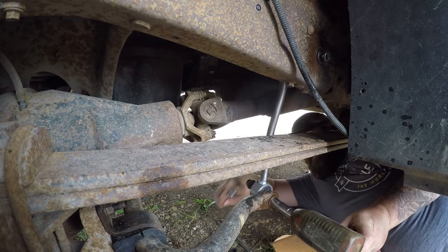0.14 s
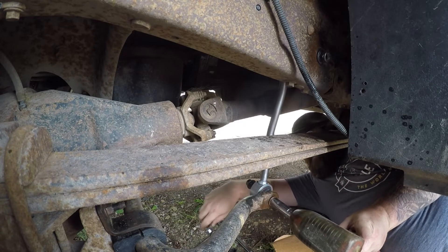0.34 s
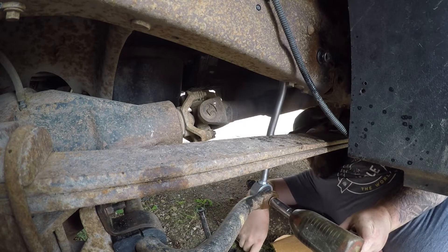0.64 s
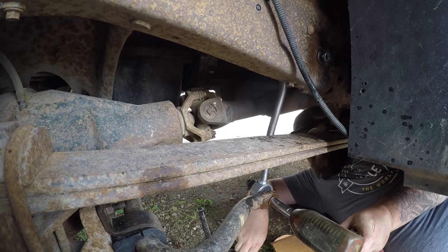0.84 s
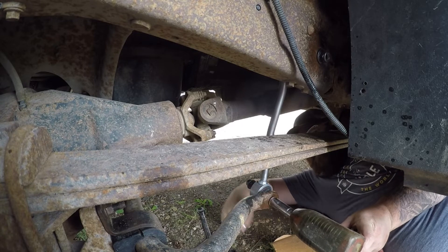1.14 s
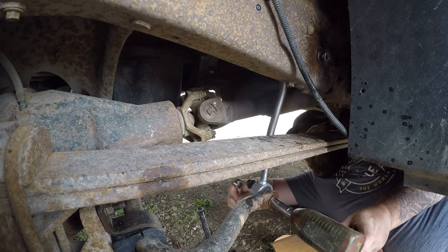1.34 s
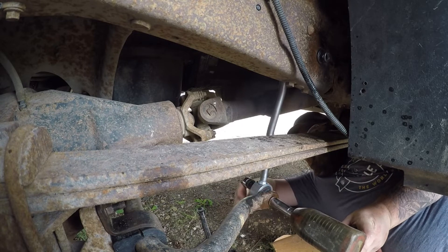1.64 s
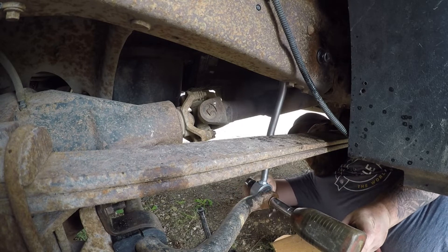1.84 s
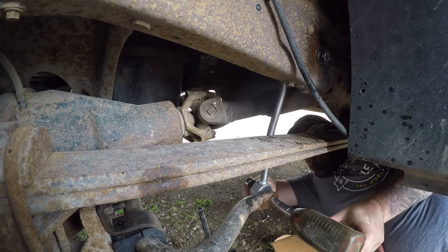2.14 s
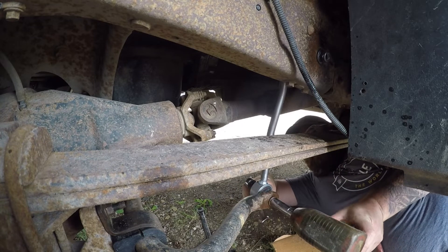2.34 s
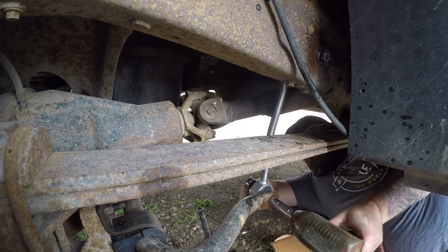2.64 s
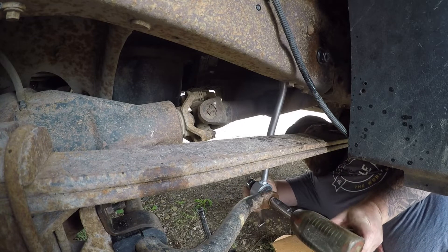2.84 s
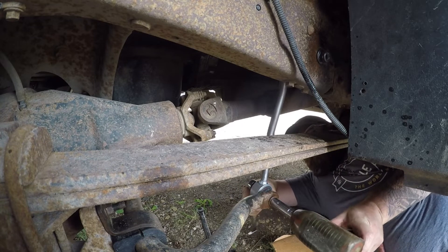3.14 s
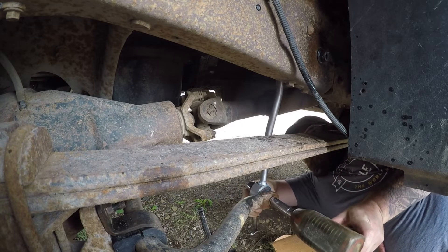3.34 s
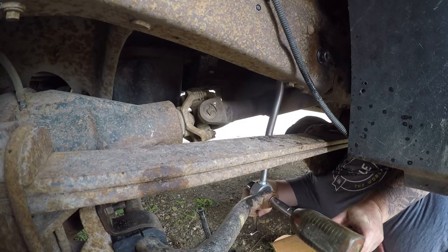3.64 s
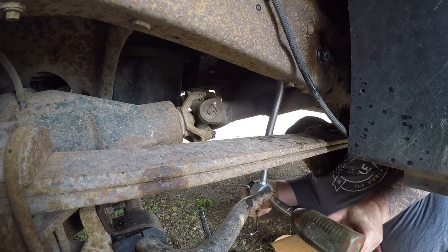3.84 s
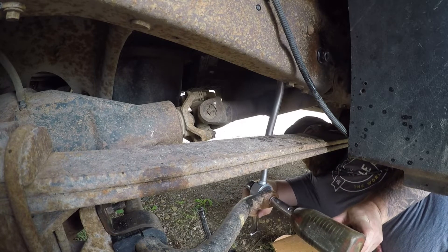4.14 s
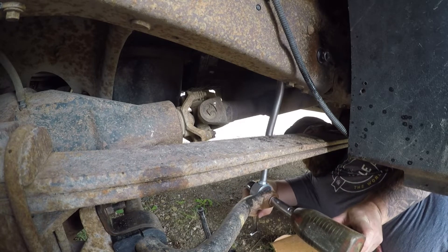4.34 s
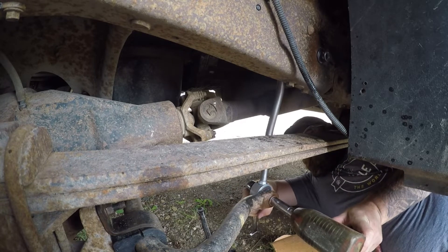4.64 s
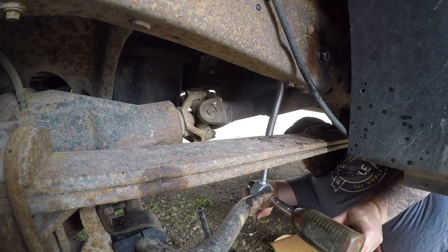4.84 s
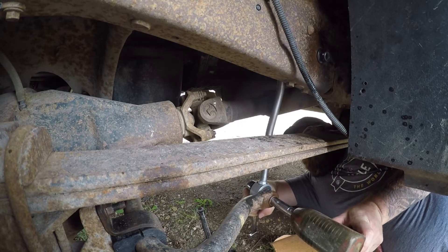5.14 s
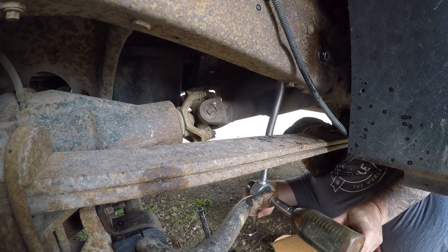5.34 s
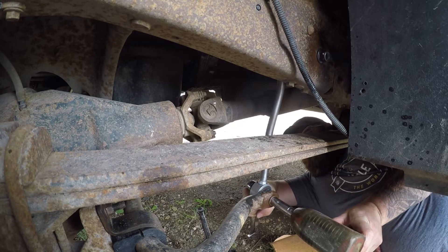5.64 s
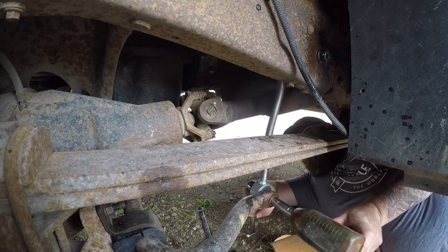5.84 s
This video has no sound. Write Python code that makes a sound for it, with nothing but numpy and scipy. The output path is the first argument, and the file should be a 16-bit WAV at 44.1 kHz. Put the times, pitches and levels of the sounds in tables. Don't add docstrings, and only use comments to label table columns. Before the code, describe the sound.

Close, dry sound with boomy knocks through the truck frame. A socket rattles and rings briefly, scuffs, then snaps and thuds onto a nut. Three quick pulls of a power ratchet follow, the first spinning freely, then a long, louder run with rapid pawl knocking about twenty times a second, over a faint low garage murmur.

```python
import sys
import numpy as np
from scipy import signal
from scipy.fft import rfft, irfft, next_fast_len
from scipy.io import wavfile
from scipy.ndimage import uniform_filter1d

SR = 44100
rng = np.random.default_rng(int(sys.argv[2]) if len(sys.argv) > 2 else 0)


def voltage_ratio(level):
    return 10 ** (np.asarray(level, float) / 20)


def log_audio(samples):
    frames = np.atleast_2d(samples).T
    limited = np.clip(frames, -1, 1)
    pcm = np.round(limited * 32767).astype(np.int16)
    wavfile.write(sys.argv[1], SR, pcm)


N = 264600
TIME = np.arange(N) / SR
COARSE = TIME[::16]

# (pulled [s], released [s], level [dB], spin-up [s], free spin before the pawl bites [s])
BURSTS = [
    (2.362, 2.714, -31, .04, .16),
    (2.768, 2.957, -32.5, .026, .012),
    (2.992, 3.675, -31.8, .019, .022),
    (3.871, 6.1, -27, .024, .012),
]
# (time [s], load on the nut [0-1], push on the linkage [dB])
HAND = [(2.4, .6, -21), (2.72, .8, -19), (2.76, .5, -30), (2.93, .35, -24.5), (3.03, .3, -29),
        (3.23, .2, -27), (3.42, .35, -37), (3.65, 1.1, -36), (3.9, .7, -32), (4.3, .7, -27), (4.58, 1, -29),
        (4.9, .8, -24), (5.25, .3, -29), (5.45, 0, -28.5), (6, .1, -33)]
# (frequency [Hz], width [Hz], level [dB])
HOUSING = [(560, 38, -0.5), (806, 42, -2), (864, 62, -3.5), (1192, 52, -4.5), (1600, 90, -11),
           (1720, 120, -10), (2060, 100, -10), (2380, 70, -12)]
HEAD = [(4430, 38, 0), (4656, 40, -4), (4920, 60, 1), (5185, 55, -1), (5440, 50, -3), (5590, 75, 2),
        (5932, 55, -2), (6250, 50, -6), (6740, 70, -2.5), (7400, 61, -7), (8070, 41, -7.5),
        (8260, 130, -7.5), (9570, 36, -20)]
# (frequency [Hz], density [dB per Hz])
HOUSING_RASP = [(180, -35), (300, -1), (479, -15), (868, -9.5), (1040, -15), (1190, -5.5), (1330, -10),
                (3800, -12), (4940, -32), (8360, -120)]
HEAD_RASP = [(1650, -21), (2800, -8.5), (3400, -14), (4310, -0.5), (5400, -1.5), (6180, -7), (6680, -5.5),
             (8310, -7), (11500, -27), (15000, -53.5), (22000, -120)]
# (time [s], peak [dB], frequency [Hz], t60 [s])
THUMPS = [(0.0, -12.5, 200, 0.1), (0.033, -16.5, 125, 0.16), (.048, -18, 230, .08),
          (0.078, -12.5, 133.4, 0.13), (.402, -30, 140, .15), (1.112, -34, 249, 0.14),
          (1.391, -16, 165, 0.14), (1.444, -11.5, 200, 0.1), (1.462, -15, 140, .12), (1.46, -26, 302, .25),
          (1.596, -22, 250, .05), (1.606, -12, 190, 0.1), (1.7, -8, 232, 0.08), (1.728, -13, 204, 0.08),
          (1.75, -13, 215, .07), (1.774, -9, 199, 0.055), (1.797, -11, 236.6, 0.1), (1.855, -9, 227, 0.08),
          (1.931, -18, 230, .05), (1.944, -11, 217, 0.07), (1.97, -20, 190, .08), (2.0, -24, 200, .1),
          (2.064, -20, 213.4, 0.12), (2.165, -27, 215, .12), (2.33, -38, 130, .15), (2.72, -13, 195, 0.06),
          (3.879, -24, 140, .07), (3.897, -23, 110, .1)]


def unit(x):
    return x / np.sqrt(np.mean(x ** 2) + 1e-20)


def along(points, hz):
    f, v = np.transpose(points)
    return np.interp(np.log(hz + 1), np.log(f + 1), v)


def curves(rows):
    s, *columns = np.transpose(rows)
    return [np.interp(TIME, s, column) for column in columns]


def filtered(x, response):
    m = next_fast_len(x.shape[-1] + 8192)
    spectrum = rfft(x, m) * response(np.fft.rfftfreq(m, 1 / SR))
    return irfft(spectrum, m)[..., :x.shape[-1]]


def resonances(peaks):
    def response(f):
        total = 0
        for k, (centre, width, db) in enumerate(peaks):
            damping = 1j * f * width
            total = total + (-1) ** k * voltage_ratio(db) * damping / (centre * centre - f * f + damping)
        return total
    return response


def noise(length=N):
    return rng.standard_normal((2, length))


def uneven(length, db, size):
    return voltage_ratio(db * unit(uniform_filter1d(rng.standard_normal(length), size=size)))


def ring(modes, t, rise, scatter_db):
    hz, db, t60 = np.transpose(modes)[..., None]
    level = voltage_ratio(db + scatter_db * rng.standard_normal(hz.shape) - 60 * t / np.clip(t60, .01, 3))
    phase = 2 * np.pi * (hz * t + rng.random((2,) + hz.shape))
    return (level * np.sin(phase)).sum(1) * (1 - np.exp(-t / rise))


def add_at(out, s, sound):
    place = out[:, round(s * SR):][:, :sound.shape[1]]
    place += sound[:, :place.shape[1]]


def trigger(lag=0, fall_db_per_s=700):
    power, shape, free = np.zeros((3, len(COARSE)))
    for pulled, released, db, spin_up, free_s in BURSTS:
        since = COARSE - pulled
        rise_db = -30 * np.clip(1 - since / (spin_up + lag), 0, 1)
        after = np.clip(COARSE - released, 0, 1)
        whirr = voltage_ratio(-24 - 300 * after) * (after > 0)
        fall = voltage_ratio(-fall_db_per_s * after) + whirr
        gain = np.clip(since / .008, 0, 1) * voltage_ratio(rise_db) * fall
        power = power + (voltage_ratio(db) * gain) ** 2
        shape = shape + gain ** 2
        free += (since > 0) * np.clip(2 - 2 * since / free_s, 0, 1)
    return [np.interp(TIME, COARSE, v) for v in (np.sqrt(power), np.sqrt(shape), free)]


def turns():
    # (time [s], speed [turns per s])
    crank = [(3.2, 24.212), (3.45, 26.077), (3.75, 20.931), (3.95, 25.06), (4.15, 26.89), (4.35, 22.777),
             (4.55, 21.479), (4.75, 21.748), (4.95, 21.496), (5.15, 21.968), (5.35, 20.808), (5.55, 18.778),
             (5.7, 20.413), (5.85, 21.536), (6, 20.913)]
    return .186 + np.cumsum(curves(crank)[0]) / SR


def strokes(decay):
    # (place in the turn [0-1], body [dB], bright [dB], timing scatter [s])
    pawl = [
        (.7, -5, -14, .004),
        (.84, -2, -9, .003),
        (.07, 1, 0, .0008),
    ]
    body, bright = np.zeros((2, N))
    for place, body_db, bright_db, scatter in pawl:
        at = np.flatnonzero(np.diff(np.floor(turns() - place)))
        luck = rng.standard_normal((len(at), 3))
        at = np.clip(at + (luck[:, 0] * scatter * SR).astype(int), 0, N - 1)
        body[at] = voltage_ratio(body_db + 1.5 * luck[:, 1])
        bright[at] = voltage_ratio(bright_db + 2.5 * luck[:, 2])
    soft = filtered(body, lambda f: 1 / (1 + 1j * f / 1000) ** 2)
    return soft, bright, signal.lfilter([1], [1, -np.exp(-1 / (decay * SR))], bright)


def patches(x, depth_db):
    z = signal.stft(x, nperseg=512)[2]
    field = uniform_filter1d(rng.standard_normal(z.shape[1:]), size=4, axis=0)
    field = uniform_filter1d(field, size=12, axis=1)
    return unit(signal.istft(z * voltage_ratio(depth_db * unit(field)), nperseg=512)[1][:, :N])


def rasp(drive, spectrum, peaks, ring_db, shaking=None):
    shaking = drive if shaking is None else shaking
    broad = unit(filtered(drive, lambda f: voltage_ratio(along(spectrum, f))))
    ringing = unit(filtered(shaking, resonances(peaks)))
    return unit(broad + voltage_ratio(ring_db) * ringing)


def ratchet(body, snaps, clicks):
    # (from [s], to [s])
    loading = (2.6, 3.2)
    # (time [s], level [dB])
    slips = [
        (3.241, 3),
        (4.97, 4),
    ]
    # (frequency [Hz], density [dB per Hz])
    whistle_colour = [(5880, -24), (10000, -3), (10800, -14), (11900, -4), (12500, 1), (13200, 0.5),
                      (14900, -2.5), (15200, -13)]
    # (frequency [Hz], width [Hz], level [dB])
    tick_modes = [(4500, 220, -3), (5600, 200, -2), (6750, 140, 0), (8100, 130, 2.5), (9700, 400, -10)]
    # (frequency [Hz], width [Hz], level [dB])
    free_modes = [(840, 160, -3.5), (2180, 47, -7.5), (3420, 110, -7.5), (4630, 120, -0.5), (5140, 47, -5),
                  (5260, 45, -2.5), (5994, 150, 1.5), (6860, 57, -2), (6950, 55, -3), (7360, 70, -3),
                  (7750, 46, -7), (7880, 110, -2), (10170, 300, -17)]
    # (frequency [Hz], difference [dB])
    free_colour = [(300, -4.5), (600, -1.5), (900, -2), (1200, -2.5), (2000, 3.5), (3300, 4.5), (4600, -4),
                   (6000, -0.5), (8000, 0.5), (10300, 6), (13000, 8.5)]
    # (frequency [Hz], width [Hz], level [dB])
    racing = [(3050, 160, -11), (5880, 260, 0), (7450, 120, -7), (10300, 700, -12)]

    running, _, free_spin = trigger()
    clicks = clicks * np.interp(TIME, loading, (.4, 1))
    effort = curves(HAND)[0]
    slip_db = sum(db * np.exp(-((TIME - s) / .01) ** 2) for s, db in slips)
    head_db = 2.5 * effort + 3 * free_spin + slip_db
    housing_db = -3.5 - 7 * free_spin - slip_db
    whistle_db = -10.5 - 10.5 * effort - slip_db

    grit = uneven(N, 1.3, 40)
    strain = 1 + .12 * np.cos(2 * np.pi * turns())
    chatter = patches(noise(), depth_db=1.18) * grit * (1 + 0.55 * clicks)
    shaking = patches(noise(), depth_db=1.8) * grit * (1 + .9 * clicks)
    blows = 40 * body * [[1], [-1]]

    head = rasp(chatter, HEAD_RASP, HEAD, ring_db=0, shaking=shaking)
    grinding = noise() * grit * strain * (1 + .8 * clicks) + blows
    housing = rasp(grinding, HOUSING_RASP, HOUSING, ring_db=3, shaking=shaking * strain + 1.1 * blows)
    hiss = noise() * grit * (1 + .9 * clicks)
    whistle = unit(filtered(hiss, lambda f: voltage_ratio(along(whistle_colour, f))))
    ticks = unit(filtered(snaps, lambda f: resonances(tick_modes)(f) / (1 + 1j * f / 9000) ** 2))
    loaded = head + voltage_ratio(housing_db) * housing + voltage_ratio(-13) * ticks

    span = slice(round(2.3 * SR), round(3.3 * SR))
    free_head = rasp(chatter[:, span], HEAD_RASP, free_modes[2:], ring_db=-0.5, shaking=shaking[:, span])
    free_drive = (noise() * grit + blows)[:, span]
    free_housing = rasp(free_drive, HOUSING_RASP, free_modes[:2], ring_db=4)
    recolour = lambda f: voltage_ratio(along(free_colour, f))
    free = np.zeros((2, N))
    free[:, span] = filtered(free_head, recolour)
    free[:, span] += voltage_ratio(housing_db[span] - 0.5) * filtered(free_housing, recolour)
    free[:, span] += voltage_ratio(-1) * free_spin[span] * unit(filtered(chatter[:, span], resonances(racing)))

    load = np.interp(TIME, loading, (0, np.pi / 2))
    tool = np.cos(load) * free + np.sin(load) * loaded + voltage_ratio(whistle_db) * whistle
    return tool * voltage_ratio(head_db) * running


def coasting():
    # (time [s], level [dB], t60 [s])
    last_ticks = [
        (3.721, -30.5, 0.076),
        (3.787, -53, 0.063),
        (3.841, -53, 0.053),
    ]
    # (from [s], to [s], frequency [Hz], level [dB])
    wake = (3.855, 4, 4648, -44)
    out, t = np.zeros((2, N)), np.arange(SR // 5) / SR
    for s, db, t60 in last_ticks:
        tick = rasp(noise(len(t)), HEAD_RASP, HEAD, ring_db=3)
        tick = tick + 0.83 * rasp(noise(len(t)), HOUSING_RASP, HOUSING, ring_db=-1)
        add_at(out, s, voltage_ratio(db - 60 * t / t60) * (1 - np.exp(-t / 0.0018)) * tick)
    start, end, hz, db = wake
    swell = np.clip((TIME - start) / (end - start), 0, 1) * (TIME < end)
    return out + voltage_ratio(db) * swell * np.sin(2 * np.pi * hz * TIME)


def clank():
    # (time [s], rise [s], stopped at [s], t60 once stopped [s], flutter [dB])
    blows = [
        (.4232, .0004, .495, .11, 2),
        (.462, .012, .51, .16, 3),
        (.4232, .045, .61, .15, 1.2),
    ]
    # (frequency [Hz], level [dB], t60 [s])
    rings = [
        [(3300, -50, .2), (3365, -47, .2), (3413, -40, .5), (3465, -47, .2), (7080, -20, .03), (3900, -46, .12),
         (5141, -40, .6), (5846, -29, 0.25), (5932, -30, .4), (7190, -21, 0.37), (8050, -33, .15),
         (8180, -33, .6), (9045, -37, .1), (9609, -37.5, .5), (10870, -31.5, .2), (12870, -44, .22),
         (13125, -40.5, .3), (15035, -43, .4)],
        [(2040, -52, .2), (2110, -58, .15), (3350, -48, .2), (3418, -38, .3), (5270, -40, .4), (5480, -42, .3),
         (5841, -30, .3), (7273, -36, .3), (8134, -33, .3), (9620, -34, .3), (9814, -37, .3), (10870, -40, .3),
         (13950, -44, .3)],
        [(690, -63, .6), (1046, -52, 2), (2976, -43, 3.6), (5141, -45, .6), (5620, -40, 2), (8222, -38.5, 2),
         (8562, -42, .9), (11645, -39, 0.5), (12345, -37, .4), (14170, -42, .9)],
    ]
    out, t = np.zeros((2, N)), np.arange(SR // 2) / SR
    for (s, rise, stop, t60, flutter_db), modes in zip(blows, rings):
        smother = voltage_ratio(-60 * np.clip(s + t - stop, 0, 1) / t60)
        for mode in modes:
            flutter = uneven(len(t), flutter_db, 250)
            add_at(out, s, ring([mode], t, rise, scatter_db=1.5) * flutter * smother)
    crack = voltage_ratio(-15.5 - 60 * t / .007) * np.diff(noise(len(t) + 1))
    add_at(out, blows[0][0], crack)
    return out


def contacts():
    # (time [s], peak [dB], t60 [s], share of ring [0-1], dullness [dB per octave])
    touches = [(0.0, -18, 0.015, 0.1, 5), (0.004, -30, 0.08, 0, 12), (0.0706, -25, 0.09, 0.3, 5),
               (1.0217, -43, 0.098, 0.5, 0), (1.2535, -38, 0.06, 0.3, -4), (1.2945, -50, 0.1, 0.2, 3.5),
               (1.3755, -32, .03, 0, -3), (1.3785, -11.5, 0.035, 0.6, -5), (1.3845, -14, .03, .6, -1.5),
               (1.3885, -16, .08, .3, -1.5), (1.3933, -22, 0.08, 0.3, 1), (1.4312, -15, 0.07, 0.7, 1.5),
               (1.4422, -16, 0.06, 0.55, 3), (1.452, -27, .07, .3, 4), (1.5931, -31, 0.07, 0, 6),
               (1.597, -29, .05, .1, 8), (1.6885, -30, 0.06, 0, 9), (1.759, -29, 0.07, 0, 7),
               (1.7669, -22, .05, .1, 7), (1.7752, -14, 0.04, 0.3, -4), (1.7765, -18, .04, .1, 7),
               (1.7785, -21, .04, .35, -3), (1.789, -25, .05, .15, 3), (1.8533, -35, .06, 0, 10),
               (1.9295, -29, 0.045, 0, 6), (1.993, -40, .04, 0, 13), (2.0503, -43, .05, 0, 10),
               (2.1326, -41, 0.06, 0.1, 5)]
    # (frequency [Hz], level [dB], t60 [s])
    socket = [(3060, -15, .07), (3400, -16, .07), (3760, -17, .09), (4330, -15, .07), (4860, -12, 0.07),
              (5430, -13, .1), (5820, -16, .08), (6100, -21, .14), (6850, -14, .11), (7080, 3, 0.04),
              (7270, -9, .07), (7700, -12, .06), (8350, -10, 0.06), (9640, -13, .045)]
    # (frequency [Hz], density [dB per Hz])
    scuff_colour = [(240, -39.5), (400, -5), (800, -17), (1250, -13), (1800, -12.5), (2600, -15),
                    (3420, -12.5), (3980, -14.5), (4430, -8.5), (6290, -9.5), (7100, -1), (7660, -13),
                    (15200, -22)]
    out, t = np.zeros((2, N)), np.arange(SR // 4) / SR
    for s, db, t60, share, dull_db in touches:
        def colour(f):
            tilt_db = -dull_db * np.log2((f + 400) / 4000)
            return voltage_ratio(along(scuff_colour, f) + tilt_db) / (1 + (f / 11500) ** 6)
        scuff = unit(filtered(noise(len(t)) * uneven(len(t), 3.1, 90), colour))
        top = filtered(scuff, lambda f: 1 / (1 + (10500 / (f + 1)) ** 8))
        scuff = scuff - top * (1 - voltage_ratio(-60 * t / .09))
        scuff = scuff * voltage_ratio(-60 * t / t60) * (1 - np.exp(-t / .0028))
        ringing = ring(socket, t, rise=.001, scatter_db=4.5)
        add_at(out, s, voltage_ratio(db - 6) * ((1 - share) * scuff + share * ringing))
    return out


def rubs():
    # (time [s], length [s], level [dB], dullness [dB per octave], lowest frequency [Hz])
    slides = [(0.397, 0.022, -46, 0, 4800), (.395, .06, -51, 12, 330), (.42, .13, -41, 2, 5600),
              (.51, .14, -48, 5, 5600), (1.086, 0.062, -45, 5.5, 350), (1.09, 0.15, -53, 5, 890),
              (1.1, .3, -62, 5, 500), (3.72, .17, -57, 12, 300), (1.705, .05, -54, 16, 900),
              (1.585, .08, -43, 55, 400), (1.7, .12, -39, 55, 400), (1.845, .06, -44, 55, 400),
              (1.925, .09, -43, 55, 400), (1.42, .95, -65, 5, 700)]
    # (frequency [Hz], width [Hz], level [dB])
    rubbed = [(533, 220, 0.5), (1180, 220, -3), (1950, 300, -4), (2880, 200, -5.5), (3750, 250, -9.5),
              (5280, 300, -6), (7200, 890, -5), (9600, 500, -11.5)]
    out = np.zeros((2, N))
    for s, length, db, dull_db, low_hz in slides:
        n = round(length * SR)
        grains = noise(n) * uneven(n, 2.5, 120)

        def colour(f):
            tilt = voltage_ratio(-dull_db * np.log2((f + 400) / 4000))
            high_pass = (f / low_hz) ** 6 / (1 + (f / low_hz) ** 6)
            return (.25 + resonances(rubbed)(f)) * tilt * high_pass / (1 + (f / 11000) ** 6)
        stroke = np.sin(np.linspace(.2, np.pi, n)) ** 2
        add_at(out, s, voltage_ratio(db) * unit(filtered(grains, colour)) * stroke)
    return out


def handling():
    # (time [s], level [dB], half width [s])
    pushes = [(.2, -34, .14), (1.47, -36, .07), (1.85, -33, .15), (2.13, -32, .1), (2.55, -39, .4),
              (3.6, -44, .28), (4.29, -25.5, .2), (5.1, -40.5, .45), (5.61, -31, .06), (5.9, -43, .2)]
    since = np.array([np.clip(COARSE - s, 0, 2) for s, *_ in THUMPS])
    peak_db = np.array(THUMPS)[:, 1:2]
    after = voltage_ratio(peak_db - 9 - 60 * since / .6) * (1 - np.exp(-since / .02))
    swing = sum(voltage_ratio(db - 6 * ((COARSE - s) / width) ** 2) ** 2 for s, db, width in pushes)
    powers = (after ** 2).sum(0) + voltage_ratio(-54) ** 2, swing + voltage_ratio(-57) ** 2
    return [np.interp(TIME, COARSE, np.sqrt(p)) for p in powers]


def frame(hits):
    # (frequency [Hz], width [Hz], level [dB])
    early_modes = [(75, 13, -12.5), (126, 23.2, -3), (163.6, 30, -4.5), (207.5, 13.6, 1.5),
                   (242.8, 34, -9.5), (296.4, 18, -15.5), (520, 140, -28)]
    late_modes = [(87, 25, -14), (128, 22, -7), (153, 26, -2.5), (174, 30, 0), (204, 30, -4),
                  (265, 70, -13)]
    on = sum((TIME > pulled) & (TIME < released) for pulled, released, *_ in BURSTS)
    drive = noise() + 40 * on * hits * [[1], [-1]]

    def drummed(modes):
        band = lambda f: 1j * f / (70 + 1j * f) / (1 + 1j * f / 400) ** 2
        return unit(filtered(drive, lambda f: resonances(modes)(f) * band(f)))
    turnover = np.interp(TIME, (3.3, 3.9), (0, np.pi / 2))
    drum = np.cos(turnover) * drummed(early_modes) + np.sin(turnover) * drummed(late_modes)

    drift = .9 * unit(uniform_filter1d(uniform_filter1d(noise(), size=4000), size=4000))
    sway = np.sqrt(2) * np.sin(2 * np.pi * 52.3 * TIME + drift)
    sway = sway + .35 * unit(filtered(noise(), lambda f: resonances([(50, 60, 0)])(f) ** 4))

    knocked, swing = handling()
    worked = voltage_ratio(curves(HAND)[1]) * trigger(lag=.04, fall_db_per_s=110)[1]
    out = np.hypot(knocked, worked) * drum + swing * sway
    t = np.arange(SR // 4) / SR
    for s, db, hz, t60 in THUMPS:
        modes = [(hz, 0, t60), (hz * 1.46, -12, t60 * 0.23), (hz * .6, -8, t60),
                 (285, -13, .08), (385, -27, .05), (540, -26, .05)]
        add_at(out, s, voltage_ratio(db + 4.5) * ring(modes, t, rise=0.007, scatter_db=-1.5))
    return out


def walls(x, t60):
    t = np.arange(SR // 3) / SR
    tail = filtered(noise(len(t)), lambda f: 1 / (1 + f / 5000)) * voltage_ratio(-60 * t / t60)
    return signal.fftconvolve(x, unit(tail) / np.sqrt(len(t)), axes=1)[:, :N]


def still_air():
    # (frequency [Hz], density [dB per Hz])
    colour = [(18, -29), (30, 0), (62, 0), (136, -19.5), (211, -2), (288, -25), (612, -28), (754, -33),
              (7060, -40), (9640, -42), (15000, -69)]
    # (time [s], level [dB])
    level = [
        (0, -53),
        (2.3, -53.5),
        (3.7, -73),
        (6, -73.5),
    ]
    return voltage_ratio(curves(level)[0]) * unit(filtered(noise(), lambda f: voltage_ratio(along(colour, f))))


def ports(pair):
    # (frequency [Hz], level re mid [dB], share in phase with mid [-1-1], share a quarter cycle ahead [-1-1])
    spread = [(50, 10.5, -0.69, .1), (90, -6.5, -.2, -.4), (140, -12.5, 0, -.3), (210, -6.5, .1, .6),
              (310, 0, .5, .5), (600, -4, .2, -.2), (1200, 2, -.15, 0), (2400, -2.5, -.1, 0),
              (4000, -9, 0, 0), (6000, 3.5, -0.073, -0.064), (9000, 1, -.2, 0), (13000, -2, -.65, 0)]
    hz, db, alike, ahead = np.transpose(spread)
    read = lambda v, f: along(np.transpose([hz, v]), f)

    def response(f):
        tied = read(alike, f) + 1j * read(ahead, f)
        own = np.sqrt(np.clip(1 - abs(tied) ** 2, 0, 1))
        return voltage_ratio(read(db, f)) * np.array([tied, own])
    side = filtered(pair, response).sum(0)
    return np.array([pair[0] + side, pair[0] - side])


def scene():
    body, snaps, clicks = strokes(decay=0.006)
    near = ratchet(body, snaps, clicks) + contacts() + rubs() + coasting() + clank()
    return ports(near + voltage_ratio(-14) * walls(near, t60=0.14) + frame(body) + still_air())


def top_cut(x):
    return signal.sosfilt(signal.butter(12, 15350, fs=SR, output="sos"), x)


def record(dry):
    # (from [s], loss after one second [dB])
    fold = [
        (2.8, 50),
        (3.35, 60),
    ]
    # (deep bass below [Hz], untouched above [Hz])
    fold_hz = (92, 11700)
    mid, side = (dry[0] + dry[1]) / 2, (dry[0] - dry[1]) / 2
    low, high = fold_hz
    bands = filtered(side, lambda f: np.array([(f >= low) & (f < high), f < low, f >= high]))
    fade_db = [-db * np.clip(TIME - s, 0, 1.4) ** 2 for s, db in fold]
    side = (bands * voltage_ratio(fade_db + [np.zeros(N)])).sum(0)
    both = np.array([mid + side, mid - side])
    both = both / (1 + abs(both / .5) ** 3) ** (1 / 3)
    return top_cut(both)


dry = scene()
out = record(dry)
log_audio(out)
```